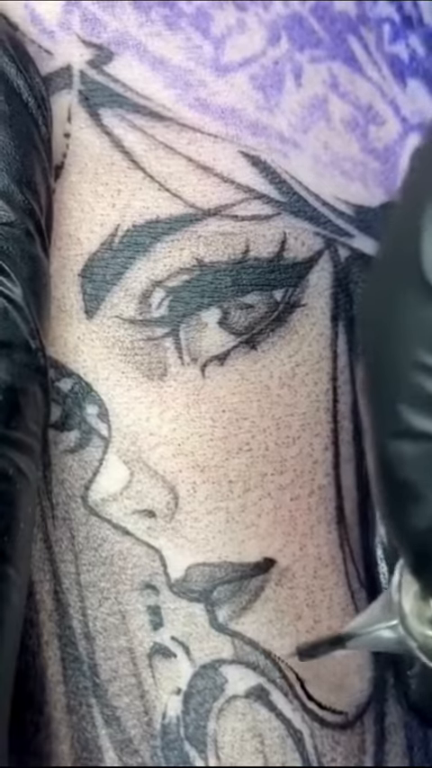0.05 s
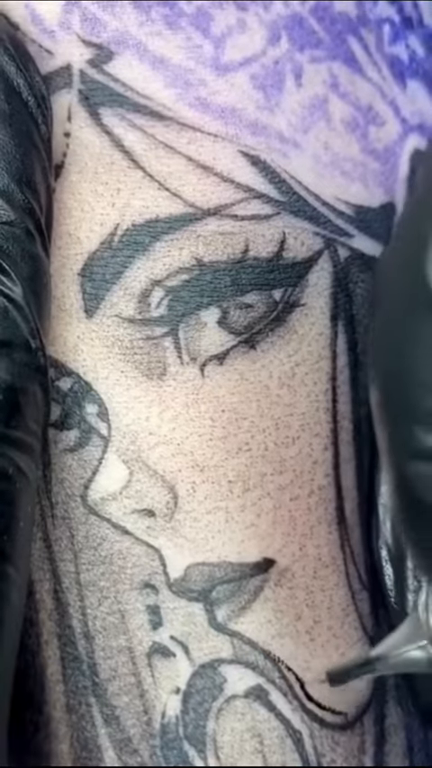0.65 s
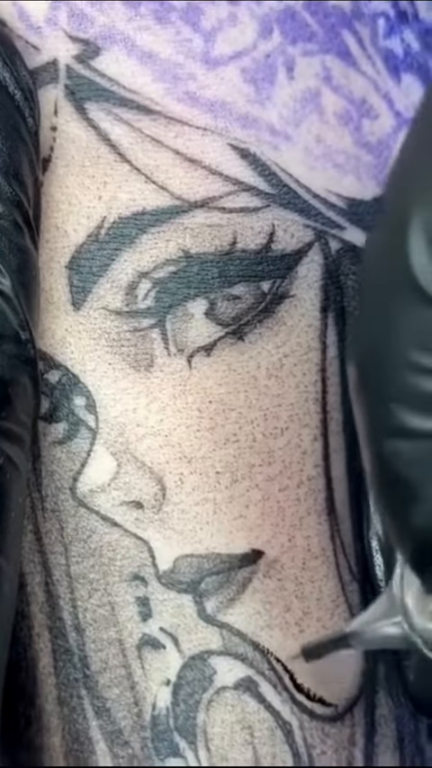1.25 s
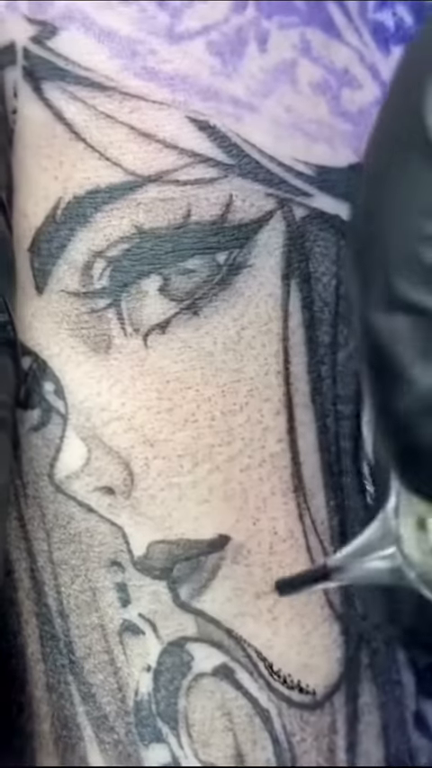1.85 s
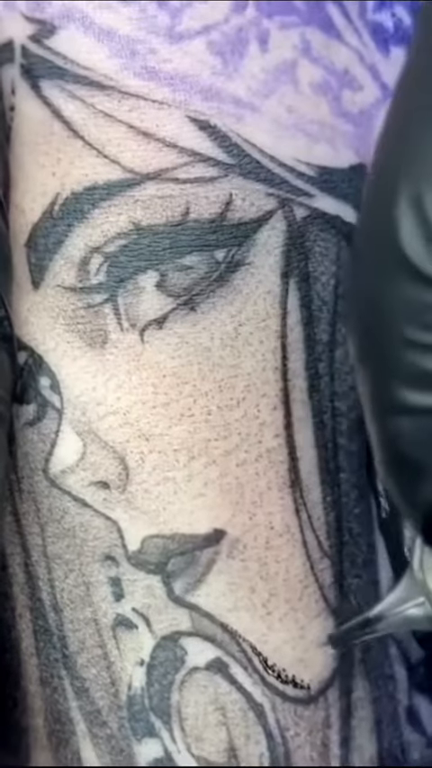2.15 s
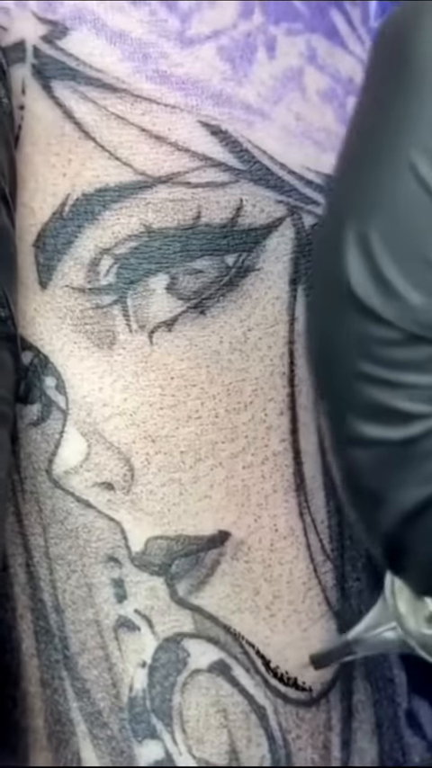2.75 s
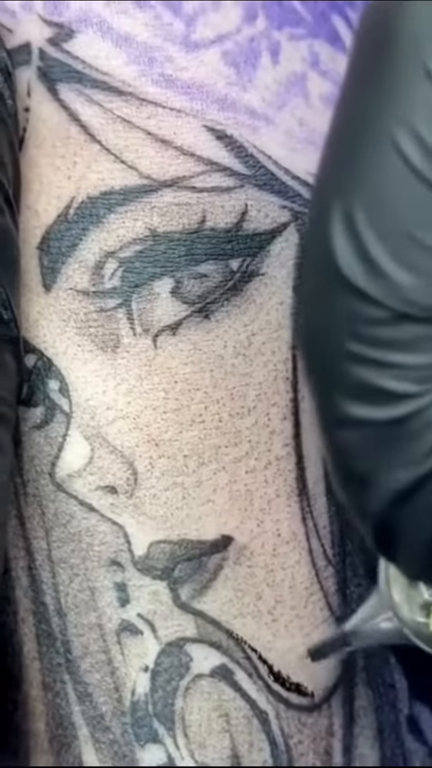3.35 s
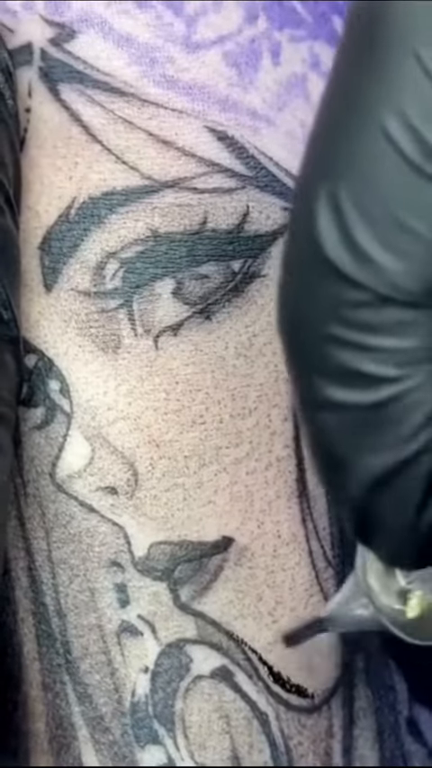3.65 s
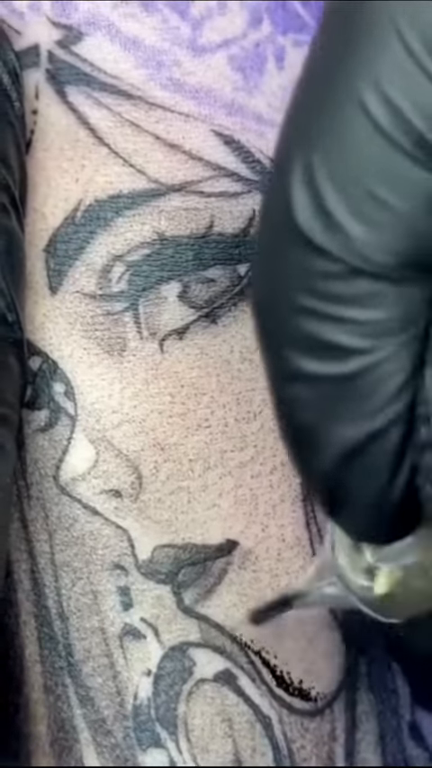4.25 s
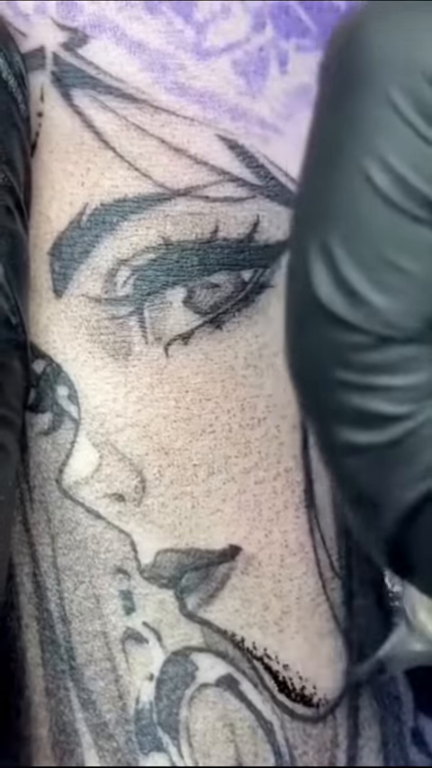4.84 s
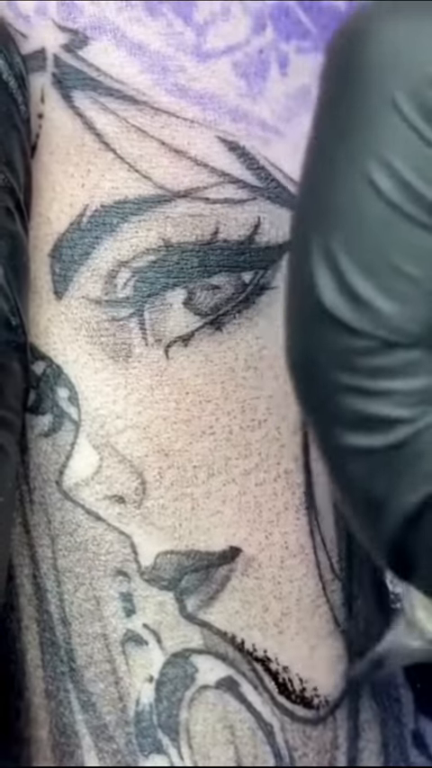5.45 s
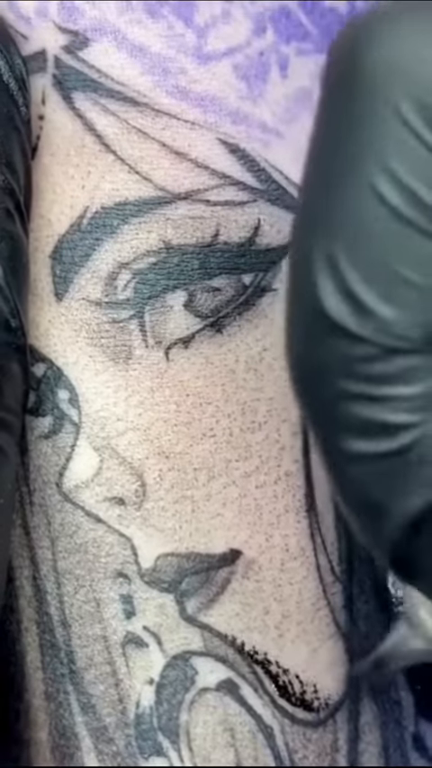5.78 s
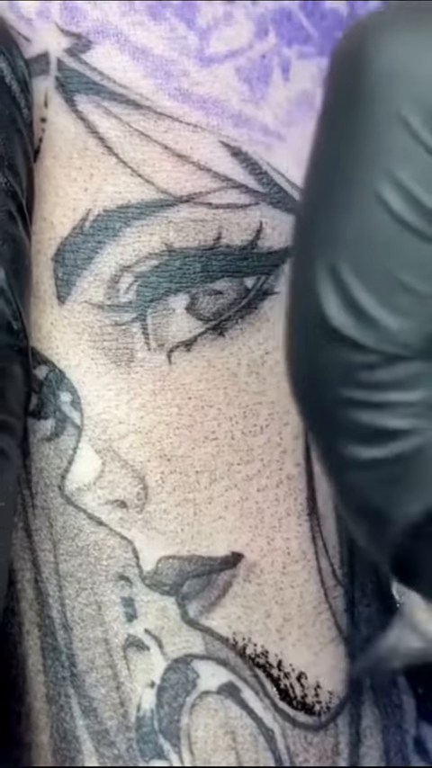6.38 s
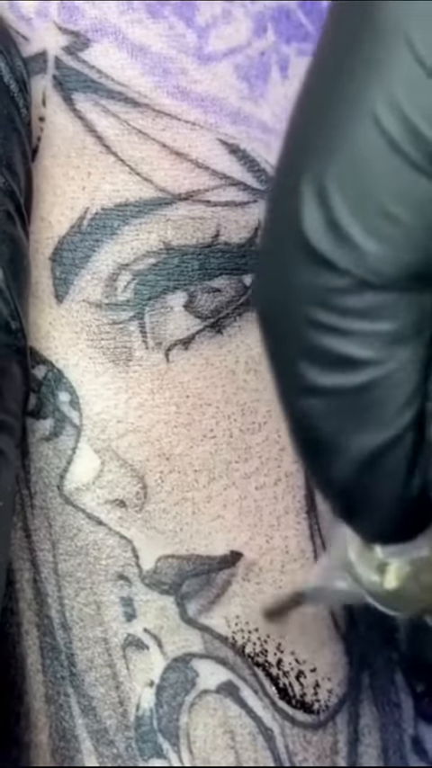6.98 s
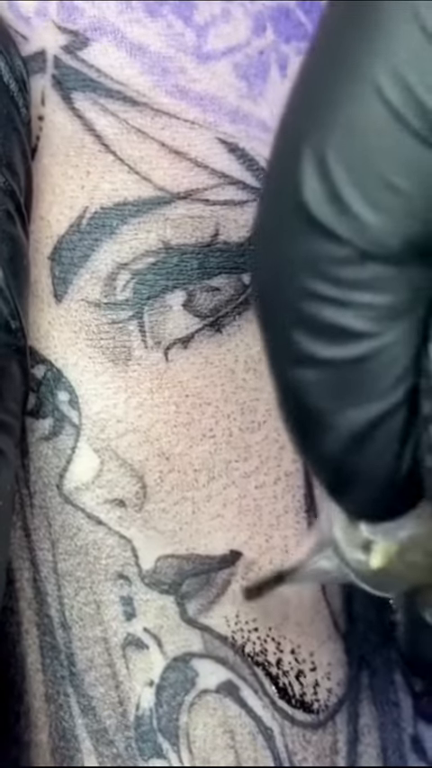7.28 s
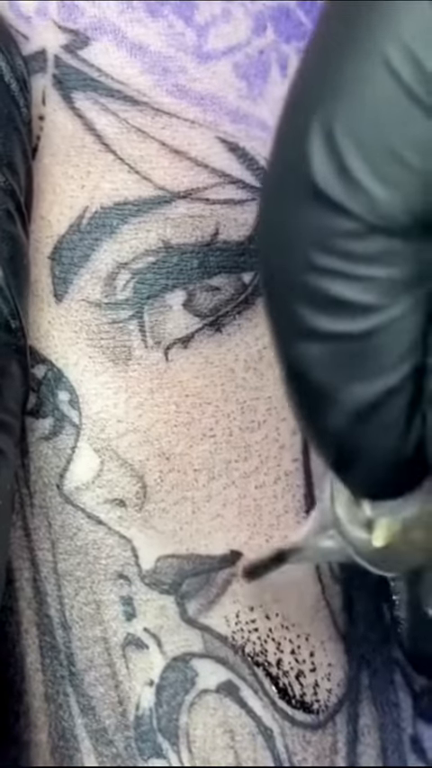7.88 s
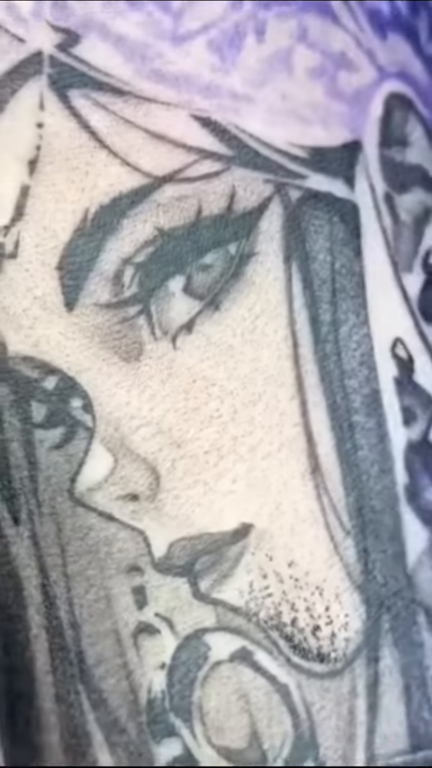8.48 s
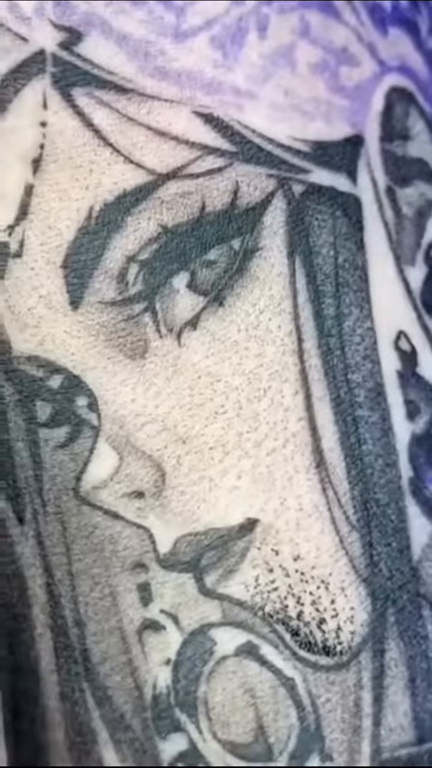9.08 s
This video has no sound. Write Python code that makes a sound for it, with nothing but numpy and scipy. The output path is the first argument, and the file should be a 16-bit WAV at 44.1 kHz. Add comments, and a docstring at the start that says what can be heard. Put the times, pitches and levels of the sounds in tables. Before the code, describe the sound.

A pen-style tattoo machine buzzes from start to finish, close up in a small, dry studio. Its pitch holds steady: a low hum with a fast rattle, needle hiss and a thin, faint whine on top. At about 1.3 seconds the pen lifts off the skin and sounds brighter and more ringing, settling back by 2 seconds. From about 3.3 to 8 seconds the needle stipples the skin in short dabs, roughly six a second. Each is a tiny burst of sharp ticks and scratches that briefly dips the buzz, so it pulses. Faint low thuds and rubs come from the hand resting on the arm. At 8 seconds the pen is drawn aside, still running, and its rattle changes colour. From about 8.3 to 9 seconds a gloved hand softly bumps the arm and wipes the skin with a few quick tissue strokes.

```python
"""A rotary pen tattoo machine runs at 94 turns a second, close by in a small, dry studio.
Its cam hums and knocks in the housing; its needle bar chatters and hisses in the cartridge.
The pen is lifted once, then stipples the skin in short dabs, one tick and scratch a turn.
At the end it is drawn aside, still running, and a gloved hand wipes the skin with a tissue."""
import sys
import numpy as np
from scipy import signal
from scipy.fft import rfft, irfft, next_fast_len
from scipy.io import wavfile

SR = 44100
rng = np.random.default_rng(int(sys.argv[2]) if len(sys.argv) > 2 else 0)


def transcribe(signal):
    """Save signal, clipped to [-1, 1], as a 16-bit WAV file at the path in sys.argv[1]."""
    frames = np.atleast_2d(signal).T
    limited = np.clip(frames, -1, 1)
    pcm = np.round(limited * 32767).astype(np.int16)
    wavfile.write(sys.argv[1], SR, pcm)


N = 402183
T = np.arange(N) / SR
SPEED_HZ = 94.04
LIFT_S, LIFT_RISE_S = 1.26, 0.074
SET_DOWN_S, SET_DOWN_FALL_S = 1.79, 0.15
STIPPLE_S, STIPPLE_RISE_S = 2.65, 1.65
ASIDE_S, ASIDE_MOVE_S = 8.05, 0.5

# cam contacts: moment/turns, spread/turns, level/dB
CAM_KNOCKS = [(.17, .05, -9), (.46, .075, 0), (.75, .04, -12), (.87, .045, -7)]
# needle dabs: t/s, strikes, tick/dB, scratch/dB, drive dip/dB, hum dip/dB
DABS = [(3.3016, 3, -27.5, -33, -1.5, -.5), (3.5676, 4, -27.5, -33, -2, -1), (3.8757, 3, -28, -29, -4, -3),
        (4.0459, 3, -31.5, -33, -1, -5), (4.1841, 6, -28, -31, -8, -4.5), (4.3756, 4, -31, -32.5, -2, -.5),
        (4.5557, 3, -27, -29.5, -1, -7), (4.7368, 2, -32, -35, -1, -2), (4.8641, 5, -30, -31.5, -4, -4.5),
        (5.0238, 5, -30.5, -32, -3, -5), (5.1618, 5, -29, -31, -6.5, -5), (5.3213, 4, -31, -34.5, -2, -1.5),
        (5.4911, 4, -27.5, -30.5, -6.5, -6), (5.6405, 7, -30.5, -31.5, -3.5, -.5),
        (5.8312, 4, -29, -30, -3.5, 0), (6.0016, 5, -30.5, -31, -4, -3.5),
        (6.1817, 4, -30.5, -30, -4.5, -2), (6.3309, 6, -29, -32, -4, -1.5),
        (6.49, 5, -31.5, -32.5, -7, -4.5), (6.6605, 5, -30, -32.5, -3.5, 0),
        (6.8301, 4, -29, -30.5, -3.5, -3), (6.9897, 6, -31.5, -34, -5.5, -2.5),
        (7.1487, 4, -28.5, -29.5, -3, -2), (7.3086, 5, -30.5, -33, -2.5, -4),
        (7.457, 5, -29.5, -32, -2.5, -.5), (7.6167, 4, -31.5, -31.5, -4.5, -3),
        (7.7653, 4, -29, -31.5, -2.5, -3), (7.9145, 4, -30, -31, -4, -4), (8.0199, 2, -33, -35, 0, -.5)]
DRIVE_DIPS_DB, HUM_DIPS_DB = np.transpose(DABS)[-2:]
# cartridge modes: f/Hz, level/dB
CARTRIDGE_MODES = [(3250, -2.5), (3700, -6), (4300, -4.5), (5150, -6), (6500, -3), (7020, 0)]


def undb(db):
    """Decibels to gain."""
    return 10 ** (np.asarray(db) / 20)


def unit(x):
    """Scale to rms 1."""
    return x / np.sqrt(np.mean(x ** 2))


def bell(x, spread):
    """Gaussian, peak 1."""
    return np.exp(-.5 * (x / spread) ** 2)


def ramp(start_s, length_s):
    """Linear move from 0 to 1."""
    return np.clip((T - start_s) / length_s, 0, 1)


def swells(rows):
    """Sum of bells from rows of t/s, spread/s, level/dB."""
    return sum(undb(db) * bell(T - s, spread) for s, spread, db in rows)


def walk(rate_hz):
    """Smooth random curve, spread near 1."""
    levels = rng.standard_normal(N // 20)
    return 1.2 * np.interp(T * rate_hz, np.arange(len(levels)), levels)


def colour(x, spectrum):
    """Filter by rows of f/Hz, gain/dB."""
    hz, db = np.transpose(spectrum)
    size = next_fast_len(N + SR // 10)
    bins_hz = np.maximum(np.fft.rfftfreq(size, 1 / SR), 1)
    gain = undb(np.interp(np.log(bins_hz), np.log(hz), db))
    return irfft(rfft(x, size) * gain, size)[:N]


def noise(spectrum, gate=1):
    """Gated, then filtered noise, rms 1."""
    return unit(colour(gate * rng.standard_normal(N), spectrum))


def cyclic(partials, phase, size=8192):
    """Periodic wave from complex rms partials; phase in cycles."""
    wave = irfft(partials, size) * size / np.sqrt(2)
    return np.interp(phase % 1 * size, np.arange(size + 1), np.append(wave, wave[0]))


def contacts(turn, rows, scatter_db):
    """Envelope of contacts that recur each turn with random force."""
    out = 0
    for moment, spread, db in rows:
        since = turn - moment + 1.5
        force = undb(db + scatter_db * rng.standard_normal(N // 100))[since.astype(int)]
        out = out + force * bell(since % 1 - .5, spread)
    return out


def lifted():
    """Freedom of the bar off the skin: 1 in the lift, briefly up a little as the pen is drawn aside."""
    leaving = ramp(ASIDE_S, LIFT_RISE_S) * (1 - ramp(ASIDE_S, ASIDE_MOVE_S))
    return ramp(LIFT_S, LIFT_RISE_S) - ramp(SET_DOWN_S, SET_DOWN_FALL_S) + 0.33 * leaving


def part_db(base_db, lift_db, set_down_db, stipple_db, aside_db):
    """Level of a loose part: base plus a change for each move of the pen."""
    return (base_db + lift_db * lifted() + set_down_db * ramp(SET_DOWN_S, SET_DOWN_FALL_S)
            + stipple_db * ramp(STIPPLE_S, STIPPLE_RISE_S) + aside_db * ramp(ASIDE_S, ASIDE_MOVE_S))


def dab_dips_db(depths_db, lag_s, spread_s):
    """The machine's sound dips briefly around each dab's last strike."""
    centres_s = [s + (strikes - 1) / SPEED_HZ + lag_s for s, strikes, *_ in DABS]
    return sum(db * bell(T - s, spread_s) for s, db in zip(centres_s, depths_db))


def room_air(level_db=-50):
    """The studio's low, uneven air noise."""
    air = [(30, -14), (110, 13), (155, 6), (200, -0.5), (250, 0), (380, -0.5), (700, -2), (1200, 4.5),
           (4000, -55)]  # spectrum: f/Hz, level/dB
    return noise(air) * undb(level_db + 6 * np.clip(walk(17), -2, 1))


def wipe(grain_db=0.5):
    """A gloved hand bumps the arm and drags a tissue over it."""
    tissue_spectrum = [(130, -16), (250, -17), (600, -1), (1000, 5), (1450, 11), (2200, 9), (3200, -16),
                       (7000, -16), (12000, -22)]  # f/Hz, level/dB
    bump_spectrum = [(90, -20), (200, 1), (340, 2), (520, -4), (800, -18), (2000, -45)]  # f/Hz, level/dB
    strokes = [(8.4, 0.085, -36), (8.545, 0.036, -30.5), (8.71, 0.044, -31), (8.95, 0.098, -40)]  # t/s, spread/s, level/dB
    bumps = [(8.285, 0.011, -38), (8.4, 0.014, -32), (8.44, 0.05, -41.5), (8.511, 0.009, -29)]  # t/s, spread/s, level/dB
    tissue = noise(tissue_spectrum, undb(grain_db * walk(400))) * swells(strokes)
    return unit(np.tanh(noise(bump_spectrum))) * swells(bumps) + tissue


def hand(rumble_db=-44, rub_db=-57, press_db=-54):
    """The hand rumbles on the pen, thuds and rubs on the arm; each dab steadies it and presses the skin."""
    rumble_spectrum = [(20, -24), (33, -15), (45, -6), (56, 0.5), (75, -2.5), (110, -9.5), (160, -35.5)]  # f/Hz, level/dB
    thud_spectrum = [(25, -26), (40, 3), (53, 6), (66, 2), (90, -7), (160, -30.5)]  # f/Hz, level/dB
    rub_spectrum = [(110, -14.5), (190, 1.5), (250, -0.5), (320, -2.5), (400, -37), (470, -2), (700, -57),
                    (1500, -25.5)]  # f/Hz, level/dB
    shifts = [(1.19, 0.031, -49, -50), (1.5, 0.047, -42, -51), (2.94, 0.07, -41, -46.5),
              (4.19, 0.032, -44, -43.5), (4.32, 0.073, -33, -52), (5.33, 0.036, -41, -51),
              (5.62, 0.11, -47, -55), (6.07, 0.083, -40, -44.5), (7.13, 0.032, -36, -46),
              (7.502, 0.096, -35.5, -68), (8.65, 0.42, -46, -48), (8.99, 0.021, -36.5, -45)]  # t/s, spread/s, thud/dB, rub/dB
    steadying_db = 0.61 * dab_dips_db(DRIVE_DIPS_DB, lag_s=0.0064, spread_s=0.016)
    holding = undb(rumble_db + 4 * np.tanh(walk(7.6)) + steadying_db)
    thuds = noise(thud_spectrum) * swells([(s, spread, db) for s, spread, db, _ in shifts])
    working = ramp(STIPPLE_S, STIPPLE_RISE_S) * undb(rub_db + 5 * np.tanh(walk(6.5)))
    presses = swells([(s + 0.02, 0.015, press_db) for s, *_ in DABS])
    shifting = swells([(s, spread, db) for s, spread, _, db in shifts])
    rubbing = np.sqrt(working ** 2 + presses ** 2 + shifting ** 2)
    return noise(rumble_spectrum) * holding + thuds + noise(rub_spectrum) * rubbing


def motor_whine(hz=8980, waver_hz=18, level_db=-49):
    """Thin, unsteady whine of the motor."""
    phase = np.cumsum(hz + waver_hz * walk(60)) / SR
    return np.sqrt(2) * np.sin(2 * np.pi * phase) * undb(level_db + 2 * walk(40))


def bearing(turn, level_db=-44, low_hz=880, high_hz=1520, spread_hz=115, period_turns=7):
    """Bearing roughness repeats over several turns, slipping a little: tones between the harmonics."""
    order = np.arange(period_turns * 20) / period_turns
    hz = order * SPEED_HZ
    body = undb(-7) * bell(hz - low_hz, spread_hz) + bell(hz - high_hz, spread_hz)
    partials = body * (order % 1 > 0) * np.exp(2j * np.pi * rng.random(len(hz)))
    slip_turns = 0.01 * walk(12)
    return undb(level_db) * unit(cyclic(partials, (turn + slip_turns) / period_turns))


def loose_ring(turn, level_db=-38):
    """Off the skin the needle bar overshoots once a turn and rings its cartridge."""
    ring_spectrum = [(2300, -12), (2650, -7), (3000, -10), (3500, -20), (3900, 2), (4300, -3), (4800, -1),
                     (5100, -1), (5400, -27)]  # f/Hz, level/dB
    gate = 0.25 + contacts(turn, [(0.26, 0.084, 0)], scatter_db=5)
    return noise(ring_spectrum, gate) * undb(level_db) * lifted()


def cam_hum(turn, second_db=-29, wobble_db=1.3):
    """The eccentric cam shakes the pen: nearly a sine, unsteady in the hand, weaker in each dab."""
    vibration = [(0, -34.5), (.5, -37), (1.45, -31), (2.3, -33), (4, -33), (5.8, -32), (6.75, -34.5),
                 (7.45, -32.5), (8.2, -33), (8.6, -35.5), (9.12, -37)]  # t/s, level/dB
    wave = np.sin(2 * np.pi * turn) + undb(second_db) * np.sin(4 * np.pi * turn)
    level_db = np.interp(T, *np.transpose(vibration))
    dips_db = dab_dips_db(HUM_DIPS_DB, lag_s=-0.0096, spread_s=0.018)
    return np.sqrt(2) * wave * undb(level_db + dips_db + wobble_db * walk(14))


def drive_tones(turn, aside, bar_order=27, waver_turns=0.0017):
    """Periodic part of the knocks: low tones from the cam, high from the bar; they waver once aside."""
    harmonics = [(7, -63, -63, -63), (9, -55, -54, -52), (10, -58, -64, -64), (11, -54, -51, -56),
                 (12, -54, -50, -51), (13, -42, -40, -43), (14, -49, -45, -54), (15, -45, -45, -48),
                 (16, -42, -44, -49), (17, -49, -50, -63), (20, -52, -47, -43), (21, -44, -47, -43),
                 (22, -54, -55, -44), (23, -51, -54, -43), (24, -55, -49, -40), (25, -54, -53, -52),
                 (28, -50, -42, -38), (29, -51, -56, -48), (31, -50, -45, -51), (32, -59, -48, -53),
                 (33, -62, -58, -47), (34, -55, -46, -52), (35, -54, -50, -61), (36, -51, -52, -58),
                 (37, -54, -53, -59), (40, -58, -64, -48), (41, -49, -41, -47), (42, -49, -43, -64),
                 (43, -49, -43, -47), (45, -45, -42, -50), (46, -54, -50, -51), (47, -43, -42, -53),
                 (49, -46, -42, -44), (50, -51, -49, -44), (51, -52, -48, -46), (53, -46, -44, -51),
                 (54, -51, -44, -50), (55, -48, -46, -43)]  # order, over skin/dB, lifted/dB, aside/dB
    order, skin_db, lifted_db, aside_db = np.transpose(harmonics)
    order = np.rint(order).astype(int)
    blows = sum(undb(db) * np.exp(-2j * np.pi * order * moment) for moment, _, db in CAM_KNOCKS)
    # the housing scatters each tone's arrival, the higher ones more
    scatter_rad = .8 * order / bar_order * rng.standard_normal(len(order))

    def comb(levels_db, phase=turn):
        """Harmonics bunched around the knocks."""
        partials = np.zeros(order.max() + 1, complex)
        partials[order] = undb(levels_db) * np.exp(1j * (np.angle(blows) + scatter_rad))
        return cyclic(partials, phase)

    settled = ramp(LIFT_S, LIFT_RISE_S)  # bar quieter before the lift
    tones = (1 - settled) * comb(skin_db - 3 * (order >= bar_order)) + settled * comb(skin_db)
    tones = (1 - lifted()) * tones + lifted() * comb(lifted_db + 0.1)
    tones = (1 - aside) * tones + aside * comb(aside_db, turn + waver_turns * walk(35))
    return tones * undb(.45 * walk(40))


def drive_rattle(turn, aside):
    """Play in the drive: each cam knock rings the housing a little differently."""
    housing_spectrum = [(600, -42), (760, -23), (850, 0), (1080, -14), (1300, 3), (1520, 6), (1850, 3.5),
                        (2120, 7), (2450, 2), (2850, 1), (3400, -21), (4500, -38)]  # f/Hz, level/dB
    aside_spectrum = [(700, -4), (1200, 2), (1800, -14), (2200, 8), (2450, 7.5), (2750, 0), (3300, 1.5),
                      (4100, -1), (5200, -7), (6500, -7.5)]  # f/Hz, level/dB
    gate = 1 + contacts(turn, CAM_KNOCKS, scatter_db=2)
    level_db = part_db(-37, lift_db=-1, set_down_db=-0.96, stipple_db=0.9, aside_db=-4.5)
    rattle = noise(housing_spectrum, gate) * undb(level_db)
    return rattle + undb(-32.5) * aside * noise(aside_spectrum, gate)


def drive_load_db():
    """Pressing takes up the play in the drive; it rattles more freely as the pen comes away."""
    pressed_db = dab_dips_db(DRIVE_DIPS_DB, lag_s=-.009, spread_s=.023)
    released_db = -.25 * dab_dips_db(DRIVE_DIPS_DB, lag_s=.067, spread_s=.022)
    return pressed_db + released_db


def needle_bar(turn):
    """The bar slaps in its cartridge and rasps as it slides, partly alike each turn; the tip sizzles."""
    slaps = [(.03, 0.028, -17), (.16, 0.071, -2.5), (.38, 0.024, -31), (.55, 0.023, -6), (.86, 0.1, -5.5)]  # moment/turns, spread/turns, level/dB
    chatter_spectrum = [(2200, -14), (2650, 2), (2950, -6), (3400, -3), (3900, -7), (4170, -7), (4430, 6),
                        (4780, -8), (5120, 6), (5380, -1.5), (7000, -22)]  # f/Hz, level/dB
    hiss_spectrum = [(1500, -71), (2900, 12.5), (3350, 3.5), (4100, 6.5), (4450, 11), (5350, 4.5),
                     (5750, 12.5), (6030, 8), (6350, 11.5), (7200, 11), (8000, 8), (9100, 10), (10000, -69),
                     (12500, -50)]  # f/Hz, level/dB
    sizzle_spectrum = [(6500, -19), (8700, -10), (9400, 28), (10000, 19.5), (11200, 25.5), (11700, 15.5),
                       (12500, 17)]  # f/Hz, level/dB
    chatter_db = part_db(-40.5, lift_db=2.5, set_down_db=3, stipple_db=1.5, aside_db=-3)
    hiss_db = part_db(-33.5, lift_db=0.5, set_down_db=-0.3, stipple_db=1, aside_db=1)
    sizzle_db = part_db(-40, lift_db=4, set_down_db=0, stipple_db=3.5, aside_db=2)
    gate = 0.19 + contacts(turn, slaps, scatter_db=3)
    chatter = noise(chatter_spectrum, gate) * undb(chatter_db)
    repeating = unit(cyclic(np.exp(2j * np.pi * rng.random(130)), turn))
    sliding = (0.2 * repeating + rng.standard_normal(N)) * (1 + 0.58 * gate)
    hiss = unit(colour(sliding, hiss_spectrum)) * undb(hiss_db + 1.5 * walk(30))
    flare = swells([(1.39, 0.053, -36)])  # tip leaves the skin
    flicker = unit(undb(3 * walk(45) + 3 * ramp(STIPPLE_S, STIPPLE_RISE_S) * walk(25)))
    grain = undb(2 * walk(700))
    sizzle = noise(sizzle_spectrum, grain) * (undb(sizzle_db) + flare) * flicker
    return chatter + hiss + sizzle


def tick(t, grip, attack_s=.0003, decay_s=.00062, ring_s=.003, detune=.024, late_cycles=1.8):
    """One prick rings the cartridge; the grip favours some modes, and the low ones arrive last."""
    chance = rng.standard_normal((len(CARTRIDGE_MODES), 2))
    out = 0
    for k, ((hz, db), held, (force, pitch)) in enumerate(zip(CARTRIDGE_MODES, grip, chance)):
        age_s = np.maximum(t + 1.3 * attack_s - late_cycles / hz, 0)
        attack = 1 - np.exp(-age_s / attack_s)
        decay = np.exp(-age_s / decay_s) + .11 * np.exp(-age_s / ring_s)
        mode = (-1) ** k * np.sin(2 * np.pi * hz * (1 + detune * pitch) * age_s)
        out = out + undb(db + 1.7 * (held + force)) * attack * decay * mode
    return out


def drag(t, grip):
    """Scratch envelope: sharp at the prick, fainter on the way in and out, longer with some grips."""
    sharp = np.exp(-np.abs(t) / np.where(t > 0, .001, .0003))
    return sharp + .42 * undb(2 * grip[0]) * np.exp(-np.abs(t) / .007)


def pricks(shape, levels_db, arch_db, fade_db, scatter_db):
    """One prick a turn; over a dab the force arches and fades, with scatter."""
    out = np.zeros(N)
    t = np.arange(-SR // 60, SR // 60) / SR
    for (s, strikes, *_), db in zip(DABS, levels_db):
        along = np.linspace(-1, 1, int(strikes))
        grip = rng.standard_normal(len(CARTRIDGE_MODES))
        chance = rng.standard_normal(10)[:len(along)]
        force_db = -arch_db * along ** 2 - fade_db * along + scatter_db * chance
        for k, size in enumerate(unit(undb(force_db)) * undb(db)):
            prick = shape(t, grip)
            turn_rms = np.sqrt(np.sum(prick ** 2) * SPEED_HZ / SR)
            start = int((s + t[0] + k / SPEED_HZ) * SR)
            out[start:start + len(t)] += size * prick / turn_rms
    return out


def needle_dabs(low_cut_hz=2400):
    """Each prick ticks the cartridge and scratches the skin; some break it with a snap."""
    skin_breaks = [(3.876, -21), (4.556, -20), (5.0241, -22), (5.1727, -21), (5.4914, -19), (5.8315, -19),
                   (5.8421, -17), (6.182, -21), (6.2139, -20), (6.4903, -20), (6.8304, -20), (7.149, -22),
                   (7.4679, -21), (7.7656, -21)]  # t/s, level/dB
    snap_spectrum = [(3000, -12), (7500, -1), (10500, 2), (12400, -10)]  # f/Hz, level/dB
    scratch_spectrum = [(5000, -6), (6800, 3), (8200, 12), (9200, 12), (10300, 16), (11500, 13),
                        (13000, -3)]  # f/Hz, level/dB
    _, _, ticks_db, scratches_db, _, _ = np.transpose(DABS)
    ticks = pricks(tick, ticks_db + .4, arch_db=2.5, fade_db=.3, scatter_db=1)
    dragging = pricks(drag, scratches_db - .5, arch_db=2, fade_db=1, scatter_db=2)
    scratches = dragging * unit(np.tanh(noise(scratch_spectrum)))
    snaps = swells([(s, .0004, db) for s, db in skin_breaks]) * unit(np.tanh(noise(snap_spectrum)))
    # the thin needle radiates no bass
    high_pass = signal.butter(4, low_cut_hz, "high", fs=SR, output="sos")
    return signal.sosfilt(high_pass, ticks + scratches + snaps)


def stereo_width(x, delay_s=.0133):
    """Mono to stereo: a short, filtered delay, added left and subtracted right, widens the sound."""
    side_spectrum = [(55, -41), (95, -58.5), (190, -22.5), (300, -7.5), (700, -6.5), (1200, -11),
                     (1600, -41), (2200, -76), (3200, -60), (5400, -68), (6100, -31), (6800, 0),
                     (7800, -6.5), (10000, -9.5)]  # f/Hz, side minus mid/dB
    delayed = np.pad(x, (int(delay_s * SR), 0))[:N]
    side = colour(delayed, side_spectrum)
    return np.array([x + side, x - side])


def scene(jitter_turns=.0009, hunting_turns=.002):
    """One shaft, hunting slightly in speed, times cam, bearing and bar."""
    turn = SPEED_HZ * T + jitter_turns * walk(70) + hunting_turns * walk(6)
    aside = ramp(ASIDE_S, ASIDE_MOVE_S)
    drive = (drive_tones(turn, aside) + bearing(turn) + drive_rattle(turn, aside)) * undb(drive_load_db())
    bar = needle_bar(turn) * undb(0.24 * dab_dips_db(DRIVE_DIPS_DB, lag_s=0.04, spread_s=0.024))
    machine = cam_hum(turn) + drive + bar + loose_ring(turn) + needle_dabs() + motor_whine()
    return stereo_width(machine + hand() + wipe() + room_air())


def record(dry, top_hz=12050):
    """The phone cuts the top."""
    return signal.sosfilt(signal.ellip(8, .2, 80, top_hz, fs=SR, output="sos"), dry)


dry = scene()
out = record(dry)
transcribe(out)
```